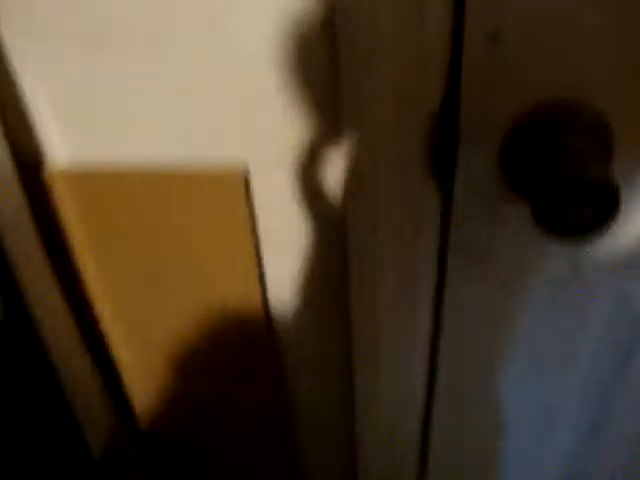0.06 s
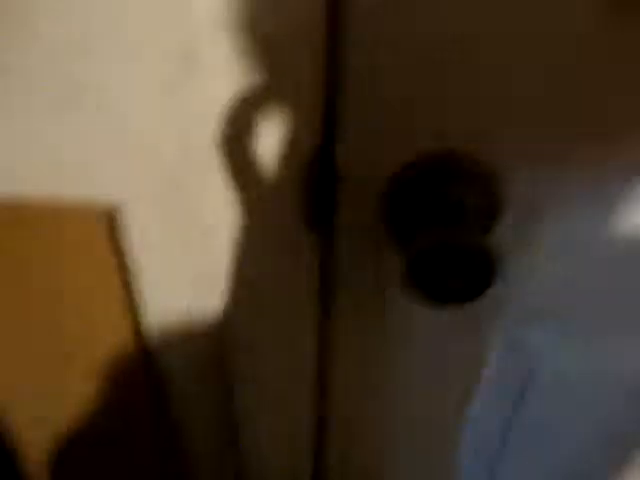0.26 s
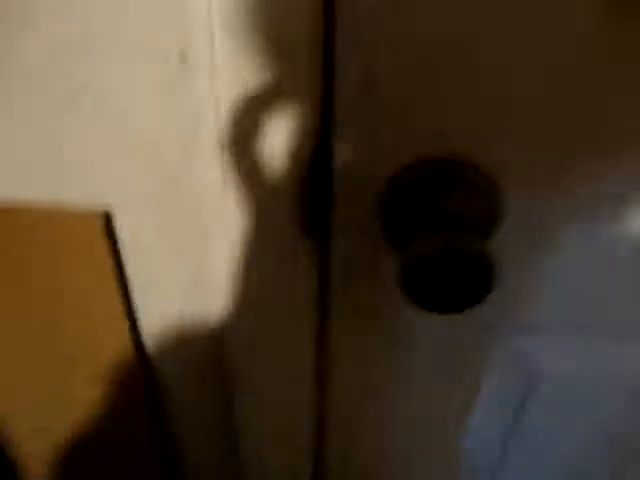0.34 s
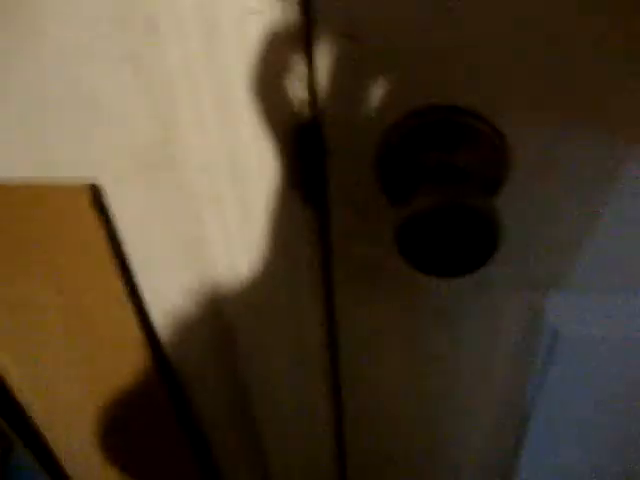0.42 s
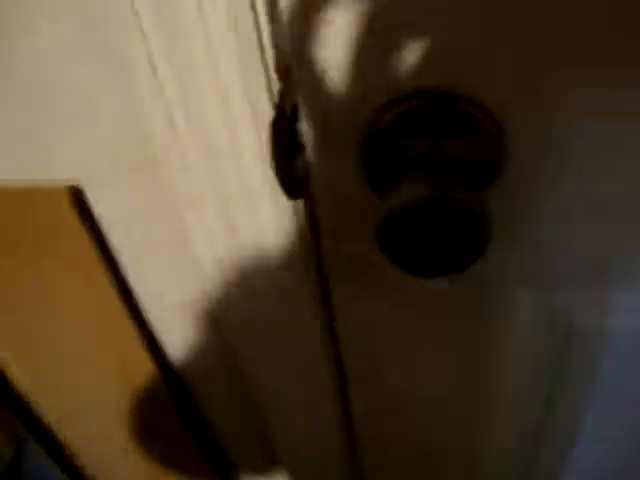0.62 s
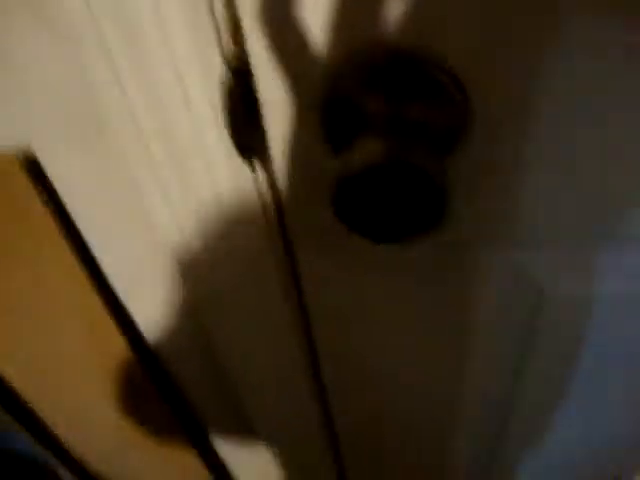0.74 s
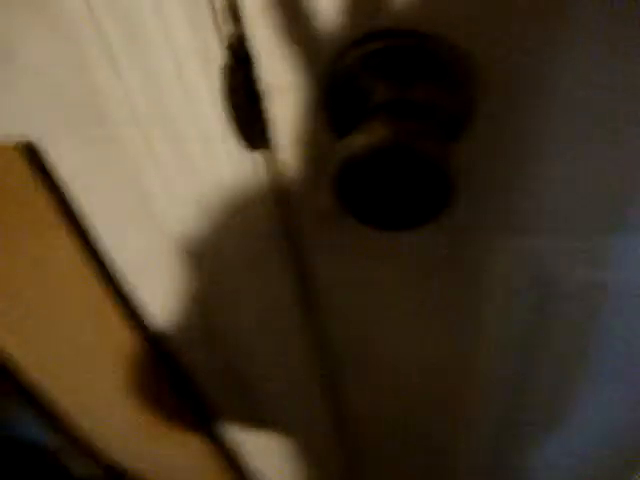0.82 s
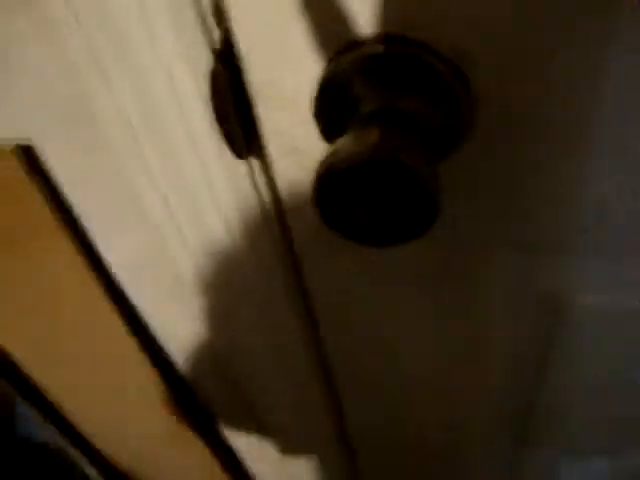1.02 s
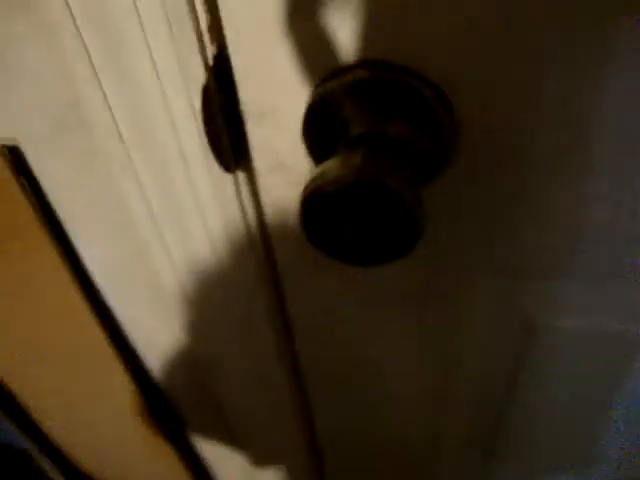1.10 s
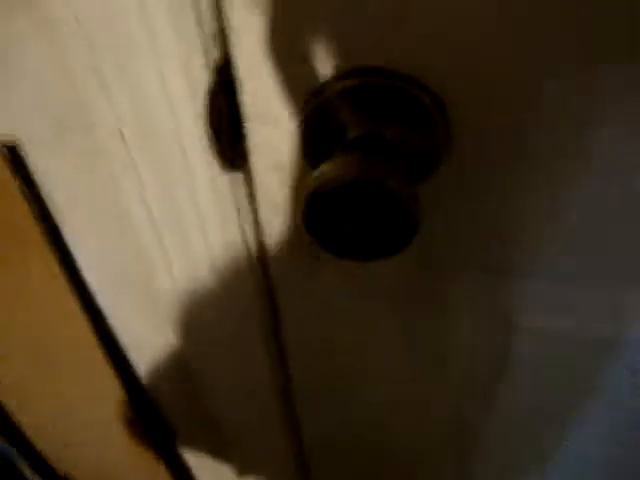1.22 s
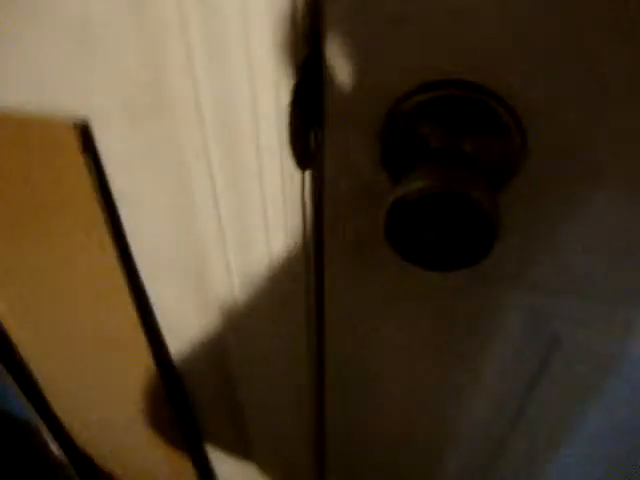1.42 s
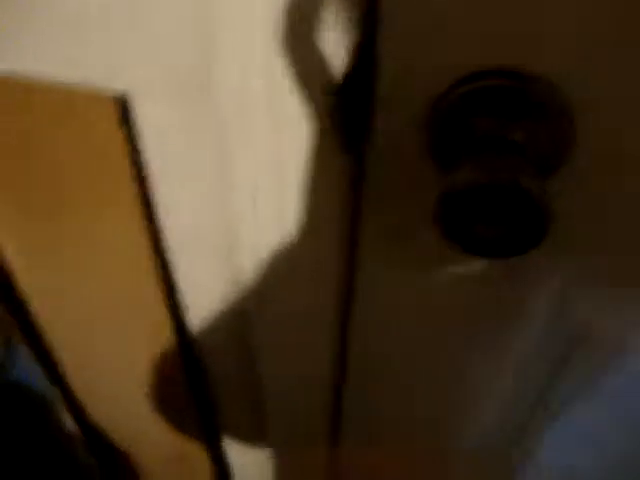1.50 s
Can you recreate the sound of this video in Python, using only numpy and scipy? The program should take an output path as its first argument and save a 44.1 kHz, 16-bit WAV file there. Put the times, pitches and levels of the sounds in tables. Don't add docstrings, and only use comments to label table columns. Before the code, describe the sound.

A locked hollow wooden door is yanked five times by its knob, close up in a small hallway; each tug gives a boxy bang, a latch snap and loose rattling, picked up by a small camera.

```python
import sys
import numpy as np
from scipy import signal
from scipy.fft import rfft, irfft
from scipy.io import wavfile
from scipy.ndimage import uniform_filter1d

SR = 44100
rng = np.random.default_rng(int(sys.argv[2]) if len(sys.argv) > 2 else 0)


def int16_out(signal):
    q = np.round(np.clip(np.atleast_2d(signal).T, -1, 1) * 32767)
    wavfile.write(sys.argv[1], SR, q.astype(np.int16))


def convert_level_to_amplitude(level_db):
    exponent = np.asarray(level_db, float) / 20
    return 10 ** exponent


N = 68355

# (time [s], grip level [dB], rub level [dB])
HAND_MOVES = [
    (0.0, -43, -47),
    (0.01, -39, -56),
    (0.031, -43, -47.5),
    (0.084, -46, -54),
    (0.117, -43.5, -39.5),
    (0.158, -38, -52),
    (0.19, -44.5, -51.5),
    (0.21, -36.5, -67),
]
# (frequency [Hz], level [dB per Hz])
GRIP_COLOUR = [(35, -46), (60, -21.5), (521, -5.5), (688, -8), (1300, -8), (3000, -41), (3900, -61),
               (6600, -120)]
# (frequency [Hz], level [dB per Hz])
RUB_COLOUR = [(880, -34), (1500, -22.5), (2570, -4), (8500, -16), (10200, -23), (10500, -26), (13600, -65),
              (22000, -120)]
# (frequency [Hz], level [dB per Hz])
AIR_COLOUR = [(18, -56), (30, -11.5), (582, -5.5), (642, 1), (801, -13.5), (1100, -3.5), (1510, -11),
              (9520, -19.5), (10500, -30.5), (13600, -46), (22000, -120)]
# (frequency [Hz], level [dB], time to fall 60 dB [s])
PANEL_MODES = [(141, -6.5, 0.093), (223.3, -4, 0.16), (303.5, -16, 0.17), (385, -8, 0.15), (490, -2, 0.14),
               (623, -16.5, 0.14), (731.2, -2.5, 0.12), (847, -9.5, 0.11), (1046, -6, 0.1),
               (1180, 2.5, 0.033), (1262, -3, 0.047), (1474, -2.5, 0.041), (1680, -24, 0.033),
               (2063, -4, 0.025)]
# (frequency [Hz], level [dB], time to fall 60 dB [s])
LATCH_MODES = [(1640, -19, 0.012), (2513, -8, 0.023), (2786, -3, 0.032), (2966, -6, 0.039),
               (3890, -31, 0.0092), (4177, -12.5, 0.033), (5060, -8, 0.0082), (7020, -7, 0.0067)]
# (frequency [Hz], level [dB per Hz])
THUD_COLOUR = [(18, -54), (30, -48), (213, -0.5), (1020, -1), (2860, -11), (3570, -20.5), (8630, -25),
               (9760, -25), (10500, -79), (13600, -75), (22000, -120)]
# (frequency [Hz], level [dB per Hz])
SNAP_COLOUR = [(180, -9), (300, -3.5), (2750, -6), (3880, -11), (5540, -12), (9750, -20), (10500, -52),
               (13600, -71), (22000, -120)]
# (time [s], force [dB], metal share [dB], favoured pitch [Hz])
DOOR_BLOWS = [(0.003, -20, -10.5, 1480), (0.203, -27, -35, 860), (0.218, -10.5, 1, 513),
              (0.229, -2.5, -12, 490), (0.25, -9.5, -10, 1080), (0.264, -9.5, 2, 1330),
              (0.281, -8, -3, 385), (0.425, -12, 3, 490), (0.435, -10.5, 2, 475), (0.445, -5.5, -12, 573),
              (0.459, -12, -0.5, 1010), (0.467, -17, 6.5, 1110), (0.48, -16, 2, 985),
              (0.645, -13, 0.5, 315), (0.653, -11, -4, 554), (0.664, -16.5, -19, 1180),
              (0.677, -3.5, -36, 1110), (0.688, -15, 4, 491), (0.866, -11, -3, 463),
              (0.873, -12.5, -2.5, 737), (0.885, -8.5, -4, 1280), (0.899, -6.5, -20, 1020),
              (0.921, -17, 3.5, 1300), (0.935, -18.5, -12, 1130), (1.126, -8, -0.5, 358),
              (1.132, -10, -35, 1120), (1.148, -5, -6.5, 713), (1.16, -9, 0, 1030),
              (1.177, -20.5, 0.5, 1070), (1.194, -18.5, -6, 930)]
# (time [s], level [dB], pitch [Hz], time to fall 60 dB [s])
SINGLE_KNOCKS = [(.003, -23.5, 1654, 0.031), (.003, -29, 2990, 0.023), (.203, -24, 955, 0.022),
                 (.223, -12.5, 1140, 0.054), (.223, -13.5, 683, 0.054), (.233, -11, 458, 0.064),
                 (.227, -13, 506, .04), (.241, -12, 473, .04), (0.261, -17, 1390, 0.057),
                 (.268, -16, 896, .03), (.25, -12.5, 1107, 0.059), (.266, -21, 1250, 0.031),
                 (.43, -20.5, 1140, 0.06), (.439, -10.5, 476, 0.063), (.441, -12, 900, 0.037),
                 (.449, -11, 496, 0.032), (.455, -11, 620, 0.028), (.459, -10, 1024, 0.045),
                 (.461, -14, 481, 0.045), (.468, -18, 1290, 0.034), (.479, -18, 532, 0.043),
                 (.468, -22, 3130, 0.04), (.479, -15.5, 907, .04), (.652, -16, 602, 0.062),
                 (.661, -12, 1180, 0.041), (.663, -15.5, 786, 0.037), (.677, -9, 997, 0.032),
                 (.681, -16, 716, .04), (.677, -13.5, 2930, 0.028), (0.681, -11.5, 1280, 0.037),
                 (.8775, -5, 832, 0.015), (.882, -12.5, 1244, 0.048), (.885, -12, 452, 0.036),
                 (0.901, -14, 905, 0.047), (.9, -17, 1300, .04), (.904, -17.5, 2847, .05),
                 (0.921, -14, 1223, 0.031), (1.031, -30.5, 1103, 0.036), (1.031, -34, 544, 0.037),
                 (1.1263, -10, 1131, 0.071), (1.133, -12.5, 1086, 0.076), (1.144, -14.5, 394, 0.034),
                 (1.15, -15.5, 2915, 0.024), (1.16, -15.5, 1866, 0.034), (1.163, -13, 937, 0.048),
                 (1.168, -17, 660, 0.048), (1.163, -20, 2785, 0.028), (.372, -28, 926, 0.022),
                 (0.568, -31, 1225, .03), (.804, -29.5, 2720, 0.028)]
# (frequency [Hz], time to fall 60 dB [s])
HALL_RING = [(60, 0.39), (250, 0.24), (1000, 0.24), (3000, 0.21), (6000, 0.18), (10000, 0.085)]
# (time [s], push [dB], pitch [Hz])
LATCH_THUMPS = [
    (0.2177, -4.5, 460),
    (0.4248, -6, 416),
    (0.6437, -9, 357),
    (0.8655, -10, 386),
    (1.1253, -6.5, 370),
]
# (hold [s], level [dB])
PANEL_CHATTER = [
    (0.043, -24),
    (0.066, -28),
    (0.026, -24),
    (0.032, -23),
    (0.023, -22.5),
]
# (time [s], force [dB], wood share [dB])
LOOSE_TICKS = [(0.291, -21, 2), (0.3267, -16, -8), (0.3737, -36.5, 11), (0.3846, -21.5, 0),
               (0.494, -21, -10), (0.5042, -36, 13.5), (0.531, -22.5, -8), (0.5700, -24, -9),
               (0.5898, -24, -1), (0.7131, -17, -1), (0.7382, -20, -19), (0.7534, -23, -32),
               (0.772, -29.5, -16), (0.8052, -30.5, -28), (0.8351, -24, -33), (0.946, -26.5, -18),
               (0.9566, -28, -2), (0.9747, -19, -19), (0.9916, -22, -0.5), (1.0306, -42, 13),
               (1.0518, -34.5, -24.5), (1.0899, -35.5, -19), (1.2158, -20, -6), (1.2357, -23, -6.5),
               (1.2418, -18, -3), (1.2511, -23.5, -16), (1.2892, -28, -19), (1.2987, -31, 0),
               (1.3203, -33, -32), (1.3564, -41, -4.5)]
# (start [s], end [s], depth [dB])
LEVEL_DIPS = [
    (0.208, 0.218, -5.5),
    (0.852, 0.862, -26),
    (1.104, 1.125, -22),
]
# (time [s], level [dB])
SILENCE_BAR = [(0, -29), (.19, -29), (.23, -25), (.28, -27), (.3, -19), (.42, -21), (.44, -30), (.49, -28),
               (.51, -18), (.58, -20), (.61, -32), (.68, -32), (.7, -24), (.85, -24), (.88, -32),
               (.94, -26), (1.1, -26), (1.17, -30), (1.2, -23), (1.32, -22), (1.36, -30)]


def evened(x):
    return x / np.sqrt(np.mean(x ** 2) + 1e-20)


def read(points, hz):
    f, value = np.transpose(points)
    return np.interp(np.log(hz + 1), np.log(f + 1), value)


def add(mix, s, sound):
    part = mix[round(s * SR):][:len(sound)]
    part += sound[:len(part)]


def coloured(points, size, patches=((1, 0), (2, 0))):
    hz = np.fft.rfftfreq(size, 1 / SR)
    level_db = read(points, hz) + read(patches, hz)
    return evened(irfft(rfft(rng.standard_normal(size)) * convert_level_to_amplitude(level_db), size))


def hand():
    t = np.arange(N) / SR
    s, grip_db, rub_db = np.transpose(HAND_MOVES)
    grip = convert_level_to_amplitude(np.interp(t, s, grip_db, right=-120)) * coloured(GRIP_COLOUR, N)
    rub = convert_level_to_amplitude(np.interp(t, s, rub_db, right=-120)) * coloured(RUB_COLOUR, N)
    return grip + rub


def still_air():
    return convert_level_to_amplitude(-57) * coloured(AIR_COLOUR, N)


def strike(modes, burst, burst_db, burst_t60, first):
    detune, scatter_s, bounce_count, patchy_db = 0.016, 0.004, 4, 4
    t = np.arange(4096) / SR
    hz, db, t60 = np.transpose(modes)[:, :, None]
    spot, drift = rng.standard_normal((2, len(modes), 1))
    fading = np.tanh(2 * spot) * convert_level_to_amplitude(db - 60 * t / t60)
    ring = (fading * np.sin(2 * np.pi * hz * (1 + detune * drift) * t)).sum(0)
    ring /= np.linalg.norm(convert_level_to_amplitude(db))
    patches = np.transpose([np.geomspace(300, 10000, 14), patchy_db * rng.standard_normal(14)])
    one = ring + convert_level_to_amplitude(burst_db - 60 * t / burst_t60) * coloured(burst, 4096, patches)
    bounces = np.zeros(1024)
    when, size = rng.random((2, bounce_count))
    bounces[(when * scatter_s * SR).astype(int)] = size + 0.29
    bounces[0] = first
    return signal.fftconvolve(one, bounces / np.linalg.norm(bounces)) / 2


def wood(centre_hz=700, focus_db=0):
    focus_octaves = 0.5
    sound = strike(PANEL_MODES, THUD_COLOUR, burst_db=0, burst_t60=0.054, first=1.8)
    near = signal.lfilter(*signal.iirpeak(centre_hz, 1 / focus_octaves, SR), sound)
    return (sound + (convert_level_to_amplitude(focus_db) - 1) * near) / convert_level_to_amplitude(focus_db / 2)


def metal():
    return strike(LATCH_MODES, SNAP_COLOUR, burst_db=1.5, burst_t60=0.02, first=0.9)


def blows():
    wood_db, metal_db = -2, -2
    out = np.zeros(N)
    for s, db, share_db, hz in DOOR_BLOWS:
        panel = convert_level_to_amplitude(wood_db) * wood(hz, focus_db=2)
        latch = convert_level_to_amplitude(share_db + metal_db) * metal()
        add(out, s, convert_level_to_amplitude(db) * (panel + latch))
    return out


def knocks():
    rise_s = 0.00096
    out, t = np.zeros(N), np.arange(4096) / SR
    for s, db, hz, t60 in SINGLE_KNOCKS:
        swell = convert_level_to_amplitude(db - 60 * t / t60) * np.minimum(t / rise_s, 1)
        add(out, s, swell * np.sin(2 * np.pi * hz * t))
    return out


def hall(x):
    delay_s, spacing = 0.004, 20
    taps = np.zeros(SR // 2)
    at = np.arange(round(delay_s * SR), len(taps) - spacing, spacing)
    taps[at + rng.integers(0, spacing, len(at))] = rng.choice([-1., 1.], len(at))
    hz, t, z = signal.stft(taps, SR, nperseg=256)
    fade = convert_level_to_amplitude(-60 * t / read(HALL_RING, hz)[:, None])
    tail = signal.istft(z * fade, SR, nperseg=256)[1]
    return convert_level_to_amplitude(-13) * signal.fftconvolve(x, tail / np.linalg.norm(tail))[:N]


def thumps():
    t60, rise_s = 0.015, 0.0003
    out, t = np.zeros(N), np.arange(2048) / SR
    for s, db, hz in LATCH_THUMPS:
        push = convert_level_to_amplitude(db - 60 * t / t60) * np.minimum(t / rise_s, 1)
        add(out, s, push * np.cos(2 * np.pi * hz * t - np.pi / 4))
    return out


def chatter(count=12):
    hits_per_s, spread_db, lag_s = 1100, 4, 0.002
    wood_fade, metal_fade, metal_db = 206, 330, -3
    t = np.arange(N) / SR
    shake, jingle, out = np.zeros(N), np.zeros(N), np.zeros(N)
    for (s, _, _), (hold, db) in zip(LATCH_THUMPS, PANEL_CHATTER):
        on = t > s + lag_s
        late = np.maximum(t - s - hold, 0)
        shake += on * convert_level_to_amplitude(db - wood_fade * late)
        jingle += on * convert_level_to_amplitude(db + metal_db - metal_fade * late)
    size = np.minimum(rng.exponential(1, N), 4)
    hits = (rng.random(N) < hits_per_s / SR) * convert_level_to_amplitude(spread_db * (size - 2))
    spot = rng.integers(0, count, N)
    for k in range(count):
        mine = hits * (spot == k)
        out += signal.oaconvolve(mine * shake, wood())[:N]
        out += signal.oaconvolve(mine * jingle, metal())[:N]
    return out


def ticks():
    rise_s = 0.003
    out = np.zeros(N)
    for s, db, share_db in LOOSE_TICKS:
        sound = metal() + convert_level_to_amplitude(share_db) * wood()
        rise = np.minimum(np.arange(len(sound)) / SR / rise_s, 1)
        add(out, s - rise_s / 2, convert_level_to_amplitude(db) * sound * rise)
    return out


def scene():
    door = blows() + knocks() + thumps() + chatter() + ticks()
    return (hand() + still_air() + door + hall(door))[None]


def silence_faint_bands(x, size=5):
    corner_hz, low_slope, high_slope, luck_db = 4900, 40, -5, 4
    hz, t, z = signal.stft(x, SR, "cosine", 256, 128)
    power = abs(z[:125]) ** 2
    bands = power.reshape(-1, size, len(t)).sum(1)
    near = uniform_filter1d(power.sum(0), size=9)
    band_hz = hz[:125].reshape(-1, size).mean(1)[:, None]
    octaves = np.log2(band_hz / corner_hz)
    bar_db = np.interp(t, *np.transpose(SILENCE_BAR)) + luck_db * rng.standard_normal(bands.shape)
    bar_db += low_slope * np.minimum(octaves, 0) + high_slope * np.maximum(octaves, 0)
    too_faint = convert_level_to_amplitude(bar_db) ** 2 * near / (bands + 1e-20)
    keep = np.ones(z.shape)
    keep[:125] = np.repeat(1 / (1 + too_faint ** 12), size, 0)
    return signal.istft(z * keep, SR, "cosine", 256, 128)[1][:N]


def roll_off(x):
    return signal.sosfilt(signal.butter(12, 11320, fs=SR, output="sos"), x)


def record(dry):
    bass_cut_hz, treble_edge_hz, ramp_s = 106, 10250, 0.004
    t, mute_db = np.arange(N) / SR, np.zeros(N)
    for start, end, depth_db in LEVEL_DIPS:
        mute_db += depth_db * np.clip(np.minimum(t - start, 3 * (end - t)) / ramp_s, 0, 1)
    x = signal.sosfilt(signal.butter(3, bass_cut_hz, "high", fs=SR, output="sos"), dry[0])
    x = np.tanh(x * convert_level_to_amplitude(mute_db))
    x = signal.oaconvolve(x, signal.firwin(255, treble_edge_hz, window=("kaiser", 8), fs=SR), "same")
    mix = silence_faint_bands(x)[None]
    return roll_off(mix)


dry = scene()
out = record(dry)
int16_out(out)
```